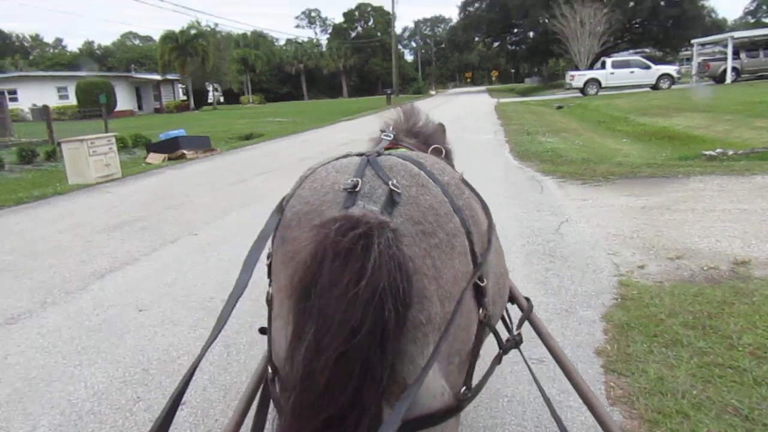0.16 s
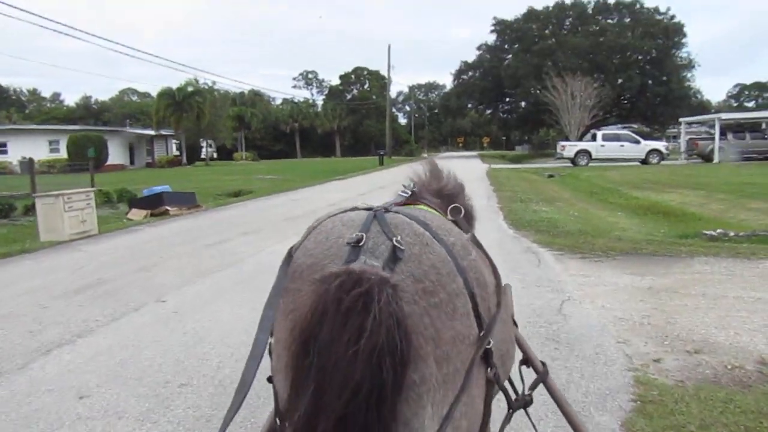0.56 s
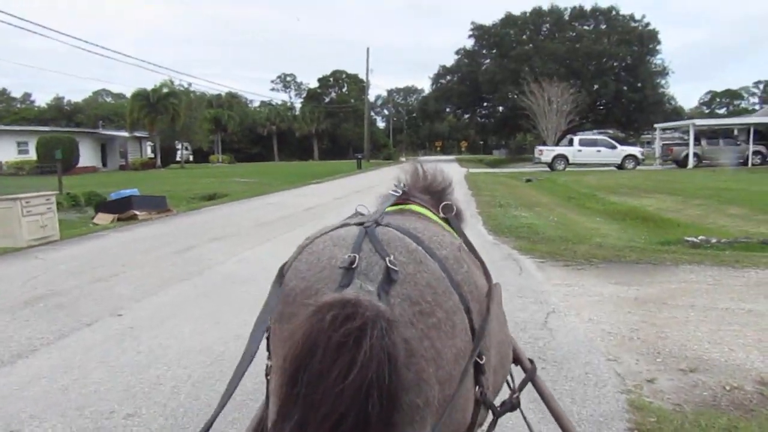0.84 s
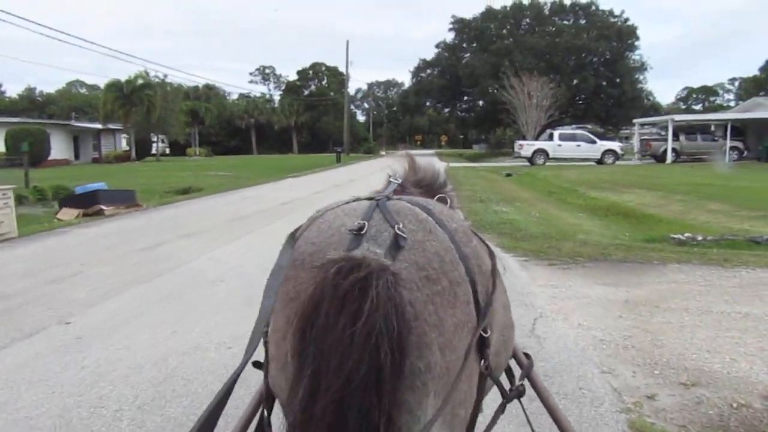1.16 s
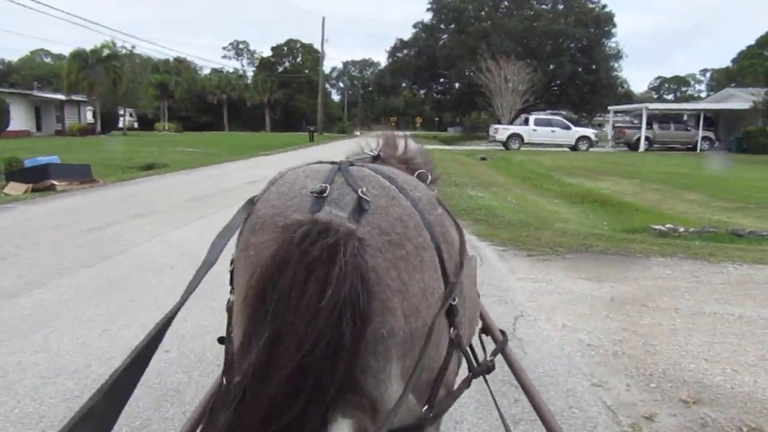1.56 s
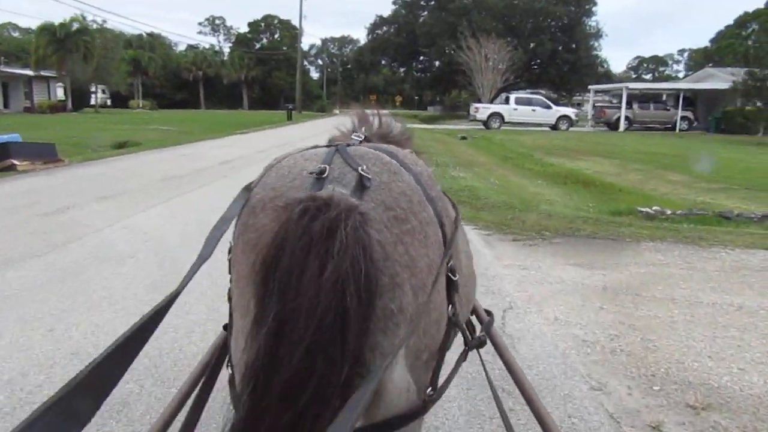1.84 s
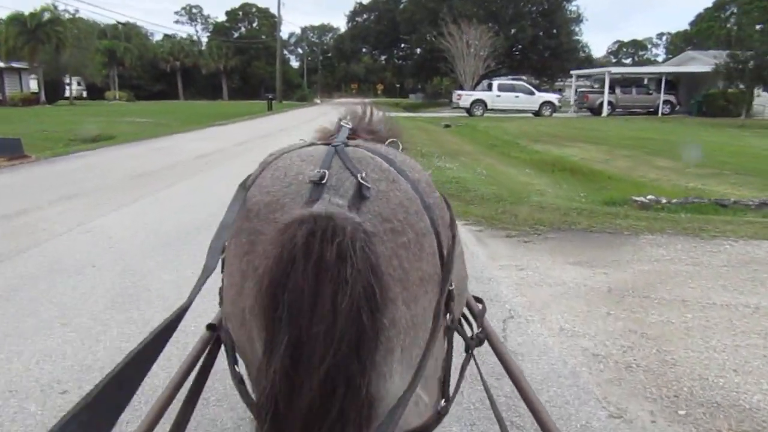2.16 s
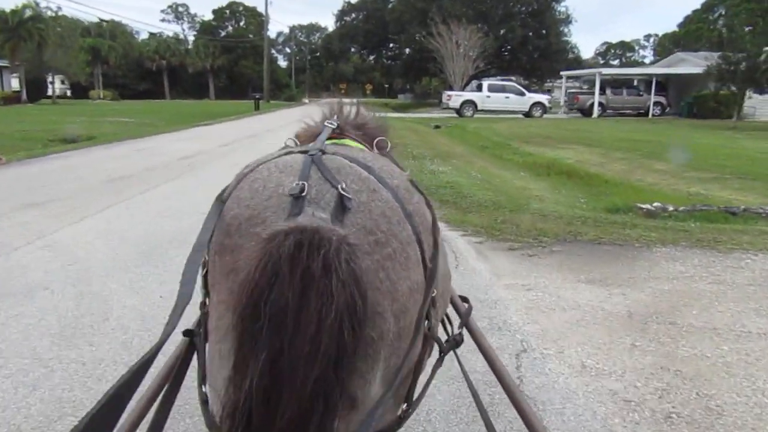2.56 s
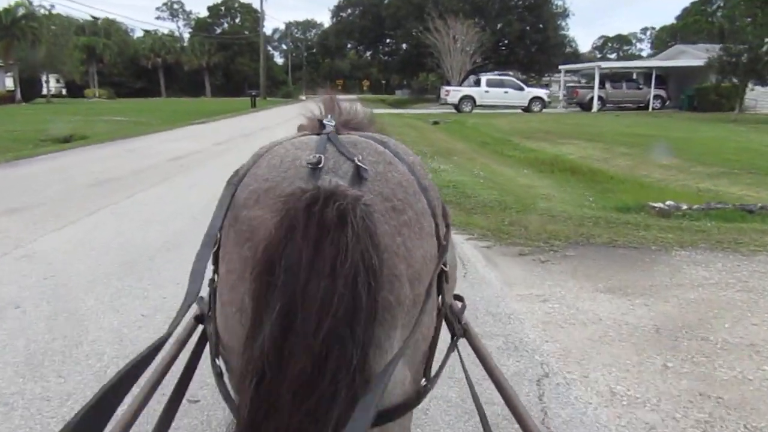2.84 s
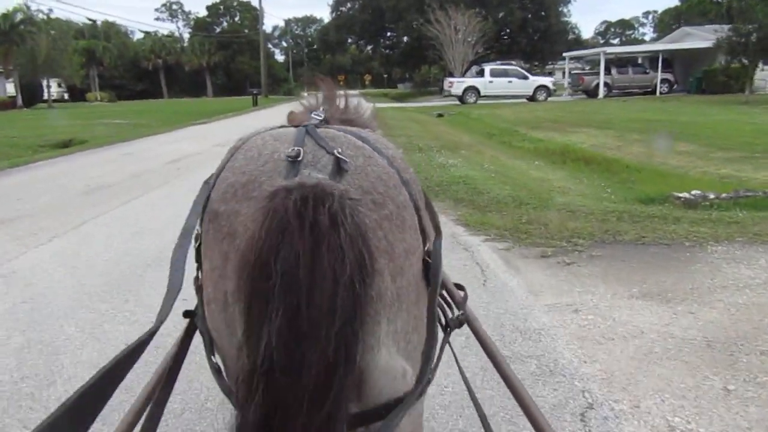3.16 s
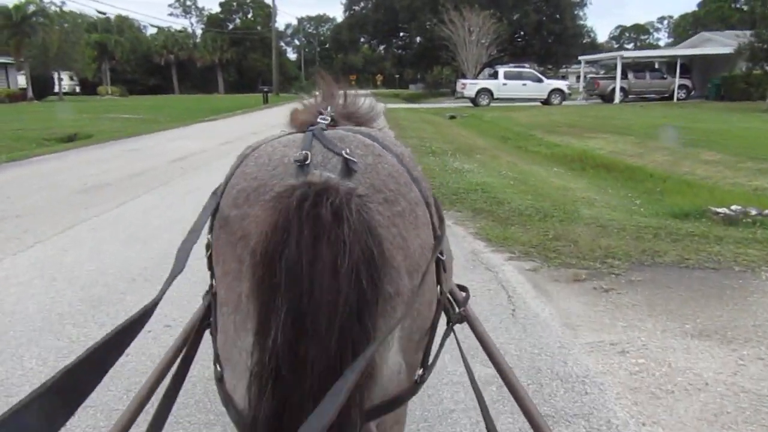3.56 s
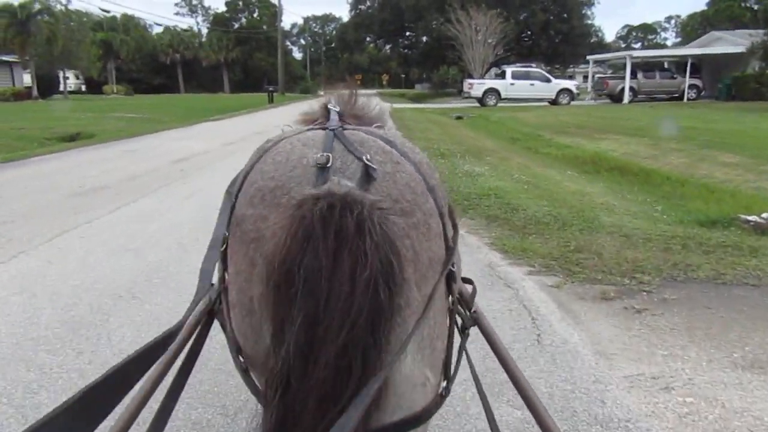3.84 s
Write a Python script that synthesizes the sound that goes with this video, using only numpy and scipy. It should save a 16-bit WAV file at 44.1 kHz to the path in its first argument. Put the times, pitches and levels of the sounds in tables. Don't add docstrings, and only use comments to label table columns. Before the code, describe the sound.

Wind buffeting dominates: irregular low thumps and flutters over rumble on a pony cart's unprotected microphone, with faint hoof knocks on asphalt, tiny harness ticks and thin insect buzz on an open residential road.

```python
import sys
import numpy as np
from scipy import signal
from scipy.fft import rfft, irfft, next_fast_len
from scipy.io import wavfile
from scipy.ndimage import uniform_filter1d, map_coordinates

SR = 44100
rng = np.random.default_rng(int(sys.argv[2]) if len(sys.argv) > 2 else 0)


def linear_from_db(decibels):
    return 10 ** (np.asarray(decibels, float) / 20)


def output_pcm(signal):
    pcm = np.clip(np.atleast_2d(signal).T, -1, 1) * 32767
    wavfile.write(sys.argv[1], SR, np.round(pcm).astype(np.int16))


N = 176400
T = np.arange(N) / SR

# [f/Hz, level/dB per Hz]
ROAD_SPECTRUM = [(290, -24), (500, -10.5), (610, -6.5), (2360, -24.5), (5370, -25), (6840, -30.5),
                 (9360, -34.5), (12100, -37), (15000, -58)]
# [f/Hz, level/dB]
WHINE_TONES = [(11763, -83), (11793, -85), (11823, -79)]
# [t/s, level/dB, tilt to the higher singers]
CHORUS_COURSE = [
    (.25, -48, -0.27),
    (1.2, -52, -0.19),
    (2, -53, .05),
    (2.9, -55.5, .1),
    (3.22, -50.5, 0.065),
    (3.45, -56, 0.018),
    (4, -60.5, 0.033),
]
# [f/Hz, level/dB]
NEAR_SINGERS = [(5217, -62), (5500, -64), (5935, -70.5), (6640, -67)]
# [f/Hz, level/dB per Hz]
SHRILL_SPECTRUM = [(3000, -29), (4000, -8.5), (5300, -3), (6500, -1.5), (7600, -3.5), (9000, -12.5),
                   (10500, -22)]
# [t/s, peak level/dB]
HARNESS_TICKS = [
    (0.422, -27.5),
    (1.849, -34),
    (2.176, -34.5),
    (2.478, -33),
    (2.7082, -34),
    (3.0324, -33),
    (3.563, -36.5),
]
# [f/Hz, level/dB]
TICK_SPECTRUM = [(500, -120), (1200, -1), (3500, 2), (5000, -9), (10000, -18), (15000, -37.5)]
# [t/s, level/dB, t60/s, top f/Hz]
KNOCKS = [(0.547, -28, 0.15, 3970), (0.869, -34, 0.027, 2100), (1.311, -45, 0.12, 3630),
          (1.692, -39.5, 0.09, 2570), (2.174, -48, 0.044, 3620), (2.396, -47, 0.022, 2500),
          (2.613, -40.5, 0.05, 2000), (2.627, -34.5, 0.025, 2030), (3.027, -50, 0.04, 3830),
          (3.349, -44.5, 0.059, 3400), (3.46, -32, 0.032, 2510), (3.481, -33, 0.047, 1880),
          (3.919, -39.5, .04, 3000)]
# [f/Hz, width/Hz, level/dB]
HOOF_RESONANCES = [(970, 170, -5.5), (1660, 184, -9), (2580, 820, -18.5), (3620, 290, -15)]
# [t/s, strength/dB]
WIND_STRENGTH = [(.25, -36), (.55, -24.5), (.7, -32.5), (.82, -24), (1.2, -28), (1.37, -27), (2.1, -20.5),
                 (2.47, -27.5), (2.7, -17), (2.9, -28.5), (3.15, -15.5), (3.3, -28.5), (3.43, -29.5),
                 (3.55, -33), (3.75, -19.5), (4, -38)]
# [centre t/s, width/s, level/dB]
GUST_TRAINS = [(0.263, 0.067, -21.5), (0.372, 0.039, -22.5), (0.418, 0.018, -20), (0.481, 0.039, -28),
               (0.544, 0.049, -18.5), (0.642, 0.012, -31), (0.893, 0.032, -21), (0.977, 0.039, -18.5),
               (1.02, 0.035, -20.5), (1.069, 0.03, -23), (1.111, 0.03, -19.5), (1.146, 0.043, -20.5),
               (1.192, 0.017, -16.5), (1.326, 0.018, -18.5), (1.448, 0.017, -18), (1.5, 0.056, -24.5),
               (1.64, 0.014, -19.5), (1.683, 0.0094, -22.5), (1.753, 0.01, -27.5), (1.801, 0.024, -22),
               (1.845, 0.0094, -9.5), (1.925, 0.03, -17.5), (1.98, 0.0093, -17.5), (2.022, 0.0097, -19),
               (2.067, 0.031, -15.5), (2.128, 0.034, -17.5),
               (2.198, 0.014, -19.5), (2.243, 0.016, -19.5), (2.276, 0.009, -10.5), (2.342, 0.016, -21.5),
              (2.422, 0.023, -25.5), (2.498, 0.0092, -22), (2.566, 0.032, -21), (2.63, 0.023, -22.5),
              (2.706, 0.025, -21.5), (2.788, 0.071, -26), (2.853, 0.016, -20), (3.035, 0.02, -20),
              (3.119, 0.034, -17), (3.157, 0.015, -21), (3.211, 0.032, -15), (3.344, 0.0094, -25.5),
              (3.463, 0.016, -23.5), (3.549, 0.061, -19), (3.68, 0.022, -21), (3.716, 0.016, -18),
              (3.782, 0.013, -10), (3.829, 0.013, -23.5), (3.901, 0.038, -18), (3.956, 0.014, -22.5)]
# [t/s, peak level/dB, f/Hz]
STRONG_EDDIES = [(0.2586, -12.5, 294), (0.3738, -6.5, 263), (0.4188, -12.5, 234), (0.5302, -5.9, 532),
                 (0.5499, -14, 295), (0.5621, -8.5, 226), (0.8856, -11.5, 238), (0.9031, -11.5, 376),
                 (0.9604, -4.5, 167), (0.9734, -3.5, 216), (0.9846, -7.5, 223), (1.0064, -10, 306),
                 (1.1115, -4.5, 366), (1.1368, -7.7, 195), (1.1491, -8, 196), (1.1955, -0.25, 310),
                 (1.4405, -6.5, 343), (1.4531, -11.5, 476), (1.5046, -9.5, 235), (1.6351, -9, 290),
                 (1.7971, -10.3, 216), (1.8416, -7.8, 205), (1.9244, -7.8, 477), (1.9766, -9, 269),
                 (2.0171, -7, 294), (2.0405, -12.2, 219), (2.0583, -5, 345), (2.0747, -3, 314),
                 (2.0871, -9, 304), (2.118, -7.5, 212), (2.1328, -2.6, 215), (2.1638, -10, 139),
                 (2.2796, -3.5, 206), (2.3407, -9, 265), (2.5573, -3, 253), (2.5722, -5.5, 254),
                 (2.6042, -11, 160), (2.6355, -11.9, 276), (2.7054, -9, 223), (2.7835, -11, 199),
                 (2.8521, -11, 248), (3.1057, -7.9, 344), (3.1285, -5, 315), (3.1861, -12, 235),
                 (3.1992, -9.5, 226), (3.2109, -5, 277), (3.2229, -11, 220), (3.243, -11.5, 183),
                 (3.5221, -7, 335), (3.5422, -4.5, 303), (3.5652, -11.5, 267), (3.5914, -10, 320),
                 (3.6807, -4, 299), (3.7188, -5.5, 181), (3.765, -10.1, 320), (3.7844, -2.3, 263),
                 (3.8056, -9.5, 233), (3.8474, -9.5, 188), (3.8904, -9.5, 287), (3.9106, -11, 410)]
# [t/s, peak level/dB]
SLOW_EDDIES = [(0.3817, -20.5), (0.5341, -17.5), (0.9043, -16.7), (0.9763, -21), (1.1239, -20.5),
               (1.1951, -17), (1.3211, -20), (1.4407, -14.5), (1.5068, -15), (1.642, -18.5), (1.8472, -20),
               (1.9094, -18.4), (1.9815, -15), (2.0583, -21), (2.1664, -14), (2.2208, -13.5), (2.2858, -22),
               (2.6044, -19.2), (3.0619, -14), (3.1188, -11.5), (3.6834, -12), (3.7271, -9.5),
               (3.7832, -13)]
# [t/s, peak level/dB]
FAST_EDDIES = [(0.2792, -23.5), (0.5323, -19), (0.5539, -23), (0.5715, -27.0), (0.9034, -25.2),
               (0.9605, -24), (1.0058, -20), (1.0901, -25), (1.1098, -25.4), (1.1954, -17.0),
               (1.4517, -18.5), (1.8458, -22.5), (1.9233, -18), (2.0632, -20), (2.0765, -26),
               (2.1326, -19.7), (2.278, -15.5), (2.5707, -27.6), (3.0943, -23), (3.1064, -22.5),
               (3.1285, -22.5), (3.1572, -25.5), (3.2117, -14), (3.5264, -18.5), (3.552, -19),
               (3.6799, -24), (3.7223, -27.2), (3.7842, -13.5), (3.891, -25), (3.9112, -26), (3.9998, -25)]
# [f/Hz, level/dB per Hz]
RUMBLE_SPECTRUM = [(20, -27), (50, -5.5), (100, -4.5), (160, -2), (250, -8.5), (400, -26.5), (700, -47),
                   (1000, -120)]
# [f/Hz, level/dB per Hz]
SPRAY_SPECTRUM = [(350, -120), (500, 3), (750, -4.5), (1000, -14), (1300, -18.5), (1800, -38), (3000, -120)]

BUZZ_HZ, BUZZ_DEPTH, LINE_DB, LINE_WIDTH_HZ = 380, 0.3, -9.5, 8
DUCK_S, DUCK_DB, RECOVER_S = 1.198, -4.5, 0.56
TICK_T60_S, TICK_DB = 0.02, -9
SNAP_S, SNAP_DB, SNAP_T60_S, SNAP_HZ = 1.1955, -19, 0.004, 4500
GUST_DB, CALM_DB, GUST_SPREAD = 4.5, -10.5, 0.43
GUST_LINGERS = 1.13
EDDY_HZ, EDDY_HZ_PER_DB, EDDY_SCATTER, EDDY_CYCLES, EDDY_SIZE_DB = 279.6, 0.04, 0.43, 0.33, 6.5
POP_CYCLES, POP_DB, POP_SHARP, POP_CLEARS_S = 0.35, -0.18, 1.087, 0.0045
HEAVE_CYCLES, HEAVE_DB, HEAVE_HZ, HEAVE_CLEARS_S = 0.5, -1, 99, 0.018
FLICK_CYCLES, FLICK_DB, FLICK_HZ = 0.56, 1, 712
RUMBLE_DB, LUMP_DB, RUMBLE_FOLLOWS = -7, 3, 0.61
SPRAY_DB, SPRAY_GROWS = -40.5, 1.57
START_S, OVERLOAD = 0.2505, 1.05
NOTCH_HZ, NOTCH_WIDTH_HZ, NOTCH_DEPTH, BAND_HZ = 7865, 45, 0.93, 14950


def unit(x):
    return x / np.sqrt(np.mean(x ** 2) + 1e-20)


def along(points, hz):
    f, v = np.transpose(points)
    return np.interp(np.log(hz + 1), np.log(f + 1), v)


def curves(rows):
    s, *cols = np.transpose(rows)
    return [np.interp(T, s, c) for c in cols]


def wobble(rate):
    knots = rng.standard_normal(int(rate * 5) + 9)
    return map_coordinates(knots, [T * rate + 2])


def filtered(x, response):
    m = next_fast_len(N + SR // 2)
    return irfft(rfft(x, m) * response(np.fft.rfftfreq(m, 1 / SR)), m)[..., :N]


def rush(spectrum, patchy_db):
    z = signal.stft(rng.standard_normal(N), nperseg=512)[2]
    field = uniform_filter1d(rng.standard_normal(z.shape), size=6, axis=0)
    field = uniform_filter1d(field, size=12, axis=1)
    x = signal.istft(z * linear_from_db(patchy_db * unit(field)), nperseg=512)[1][:N]
    return unit(filtered(x, lambda hz: linear_from_db(along(spectrum, hz))))


def road():
    return linear_from_db(ROAD_DB_DRIFT()) * rush(ROAD_SPECTRUM, patchy_db=0.5)


def ROAD_DB_DRIFT():
    return -49 + 0.16 * wobble(4.04)


def whine():
    out = np.zeros(N)
    for hz, db in WHINE_TONES:
        level = linear_from_db(db + 5 + 0.3 * wobble(6))
        out += level * np.sin(2 * np.pi * (hz * T + rng.random()))
    return out


def insects():
    level_db, tilt = curves(CHORUS_COURSE)
    buzz = 1 + BUZZ_DEPTH * np.sin(2 * np.pi * BUZZ_HZ * T + 0.76 * wobble(12))
    band = rush(SHRILL_SPECTRUM, patchy_db=1.5) * buzz
    high = filtered(band, lambda hz: np.tanh((hz - 6200) / 900))
    lines = np.zeros(N)
    for hz, db in NEAR_SINGERS:
        level = linear_from_db(db + 2.9 * wobble(4.53) + 2.8 * tilt * np.tanh((hz - 6200) / 900))
        drift = np.cumsum(LINE_WIDTH_HZ * wobble(25)) / SR
        lines += level * np.sin(2 * np.pi * (hz * T + drift))
    return linear_from_db(level_db - 3.0) * (band + np.clip(tilt, -0.9, 0.9) * high + linear_from_db(LINE_DB) * unit(lines))


def gain_duck():
    since = T - DUCK_S
    return linear_from_db(DUCK_DB * (since > 0) * np.exp(-np.maximum(since, 0) / RECOVER_S))


def harness():
    shape = np.zeros(N)
    for s, db in HARNESS_TICKS:
        shape += linear_from_db(db + TICK_DB) * (T > s) * linear_from_db(-60 * np.maximum(T - s, 0) / TICK_T60_S)
    return shape * rush(TICK_SPECTRUM, patchy_db=3.0)


def hooves():
    out, t = np.zeros(N), np.arange(SR // 5) / SR
    f = np.fft.rfftfreq(len(t), 1 / SR)
    body = 0
    for k, (centre, width, db) in enumerate(HOOF_RESONANCES):
        resonance = 1j * f * width / (centre * centre - f * f + 1j * f * width)
        body = body + (-1) ** k * linear_from_db(db) * resonance
    low = 1 / (1 + (f / 1900) ** 8)
    for s, db, t60, top_hz in KNOCKS:
        strike = rfft(rng.standard_normal(len(t))) * body / (1 + (f / top_hz) ** 10)
        fade = linear_from_db(-60 * t / abs(t60))
        knock = irfft(strike * low, len(t)) * fade + irfft(strike * (1 - low), len(t)) * fade ** 1.5
        scuff = linear_from_db(db + 0.96 * wobble(100)[:len(t)])
        attack = 1 - np.exp(-t / 0.00053)
        part = out[round(s * SR):][:len(t)]
        part += (scuff * attack * knock / np.std(irfft(strike)))[:len(part)]
    return out


def snap():
    since = T - SNAP_S
    fade = linear_from_db(SNAP_DB - 60 * np.maximum(since, 0) / SNAP_T60_S)
    burst = (since > 0) * fade * rng.standard_normal(N)
    return filtered(burst, lambda f: 1 / (1 + (f / SNAP_HZ) ** 8))


def gusts(step=32):
    t = T[::step]
    swells = 0
    for s, width, db in GUST_TRAINS:
        late = (t - s) / (GUST_SPREAD * width)
        late = np.where(late > 0, late / GUST_LINGERS, late * GUST_LINGERS)
        swells = swells + linear_from_db(2 * db) / np.cosh(np.clip(late, -50, 50)) ** 2
    return linear_from_db(GUST_DB) * np.sqrt(np.interp(T, t, swells))


def wavelets(s, hz, gain, phase, cycles, size=900):
    k = np.arange(-size // 2, size // 2)
    turn = k / SR * hz[:, None]
    w = gain[:, None] / np.cosh(turn / cycles) * np.cos(2 * np.pi * turn + phase[:, None])
    w = w - w.mean(axis=1, keepdims=True) * np.hanning(size) * 2
    at = np.clip(np.round(s * SR).astype(int)[:, None] + k, 0, N)
    return np.bincount(at.ravel(), w.ravel(), N + 1)[:N]


def single(rows, db, cycles, hz, size):
    s, peak_db = np.transpose(rows)[:2]
    v = rng.random((len(s), 3))
    phase = np.pi * (v[:, 0] > 0.5) + 1.31 * (v[:, 1] - 0.5)
    pitch = hz * (1 + 0.22 * (v[:, 2] - 0.5))
    return wavelets(s, pitch, linear_from_db(peak_db + db), phase, cycles, size=size)


def clearing(rows, width_s, depth):
    passing = sum(np.exp(-((T - row[0]) / width_s) ** 2) for row in rows)
    return 1 - depth * np.clip(passing, 0, 1)


def small_eddies(flow, count=880):
    u, g = rng.random((count, 2)), rng.standard_normal((count, 2))
    s = (np.arange(count) + u[:, 0]) * N / SR / count
    local = np.interp(s, T, flow)
    size = local * linear_from_db(EDDY_SIZE_DB * np.tanh(g[:, 0]))
    rise = EDDY_HZ_PER_DB * (20 * np.log10(local) + 20)
    hz = EDDY_HZ * np.exp(rise + EDDY_SCATTER * np.tanh(g[:, 1]))
    return wavelets(s, np.clip(hz, 90, 600), size, 2 * np.pi * u[:, 1], EDDY_CYCLES)


def wind():
    strength_db, = curves(WIND_STRENGTH)
    calm_db = strength_db + CALM_DB + 8.7 * np.tanh(wobble(22.065))
    flow = np.sqrt(linear_from_db(1.844 * calm_db) + gusts() ** 2)
    eddies = small_eddies(flow)
    pop_hz = np.transpose(STRONG_EDDIES)[2]
    pop_cycles = POP_CYCLES * (pop_hz[:, None] / 280) ** 0.57
    pops = single(STRONG_EDDIES, POP_DB, pop_cycles, POP_SHARP * pop_hz, size=1200)
    pops = pops + single(FAST_EDDIES, FLICK_DB, FLICK_CYCLES, FLICK_HZ, size=600)
    heaves = single(SLOW_EDDIES, HEAVE_DB, HEAVE_CYCLES, HEAVE_HZ, size=3600)
    eddies = eddies * clearing(STRONG_EDDIES, POP_CLEARS_S, 0.77)

    rumble = unit(linear_from_db(LUMP_DB * wobble(14)) * rush(RUMBLE_SPECTRUM, patchy_db=0.0))
    rumble = rumble * (flow / linear_from_db(strength_db - 6.5)) ** RUMBLE_FOLLOWS
    rumble = linear_from_db(strength_db + RUMBLE_DB) * rumble * clearing(SLOW_EDDIES, HEAVE_CLEARS_S, 0.69)

    buffeting = 10 * uniform_filter1d(np.abs(eddies + pops), size=350)
    spray = linear_from_db(SPRAY_DB) * buffeting ** SPRAY_GROWS * rush(SPRAY_SPECTRUM, patchy_db=3.0)
    return eddies + pops + heaves + spray + rumble


def scene():
    background = gain_duck() * (insects() + road() + whine())
    return (background + harness() + hooves() + snap() + wind())[None]


def low_pass(x):
    return signal.sosfilt(signal.butter(12, 15110, fs=SR, output="sos"), x)


def record(dry):
    x = dry / (1 + (dry / OVERLOAD) ** 4) ** (1 / 4)

    def response(hz):
        notch = 1 - NOTCH_DEPTH * np.exp(-0.5 * ((hz - NOTCH_HZ) / NOTCH_WIDTH_HZ) ** 2)
        return notch * (hz < BAND_HZ)

    fade_in = np.clip((T - START_S) / 0.00227, 0, 1) ** 2
    return low_pass(filtered(x, response) * fade_in)


dry = scene()
out = record(dry)
output_pcm(out)
```